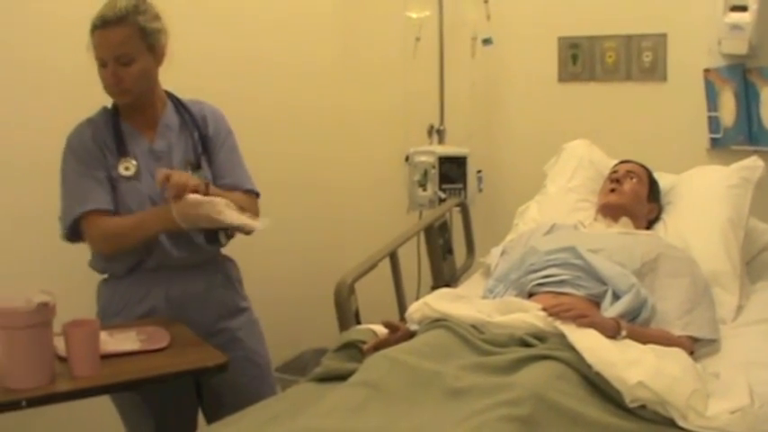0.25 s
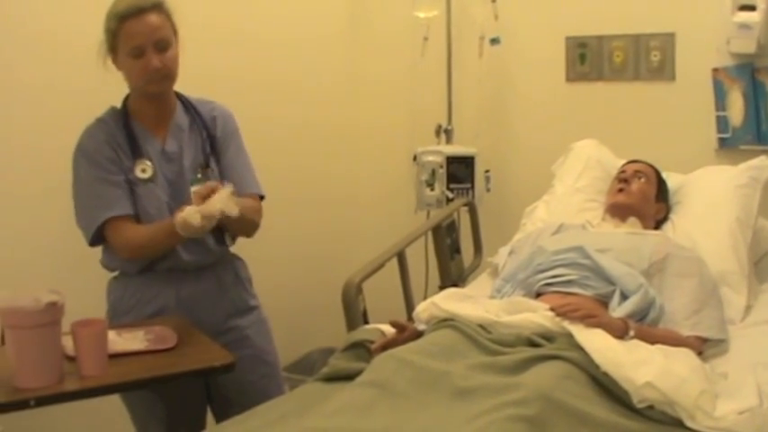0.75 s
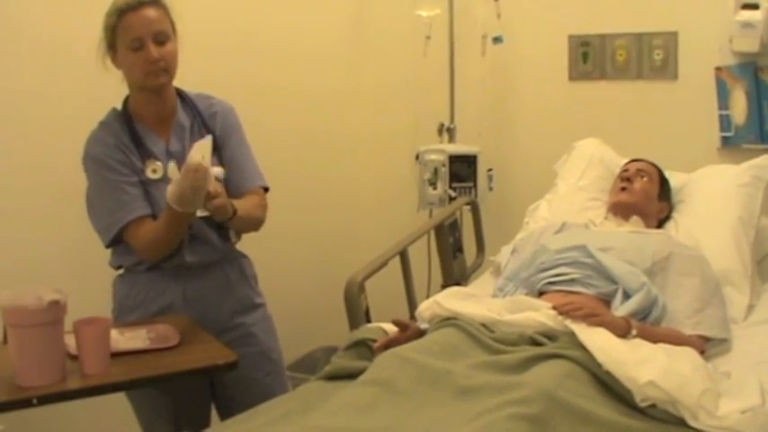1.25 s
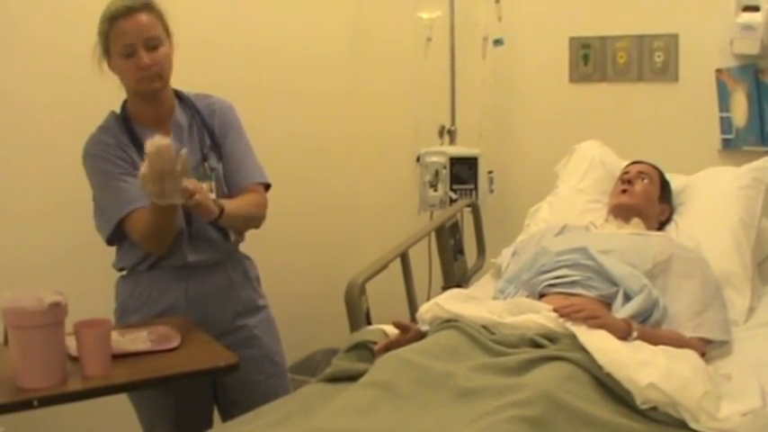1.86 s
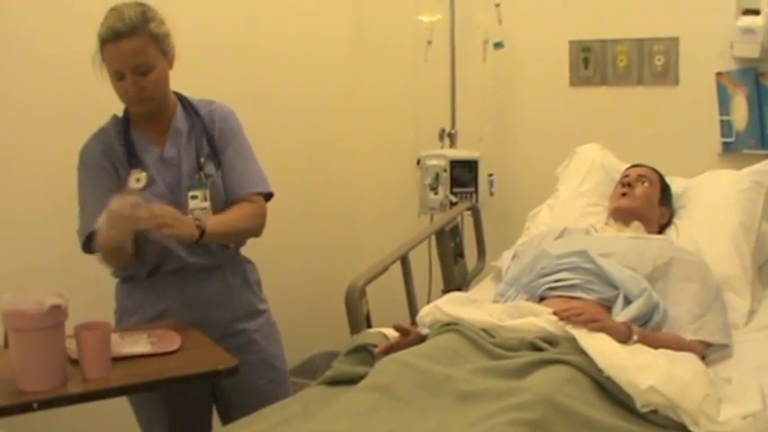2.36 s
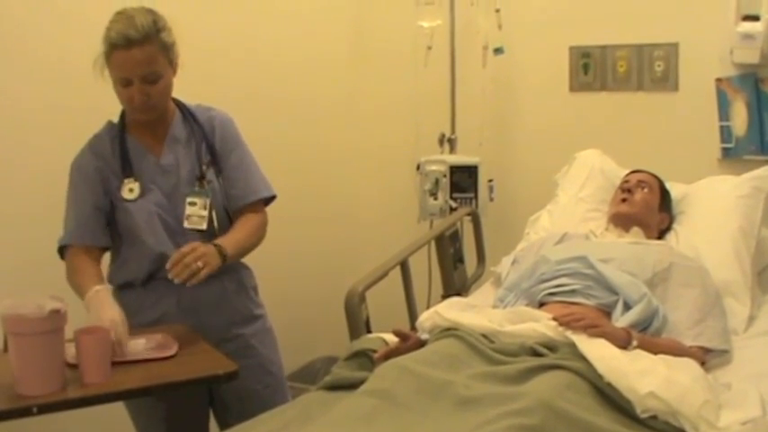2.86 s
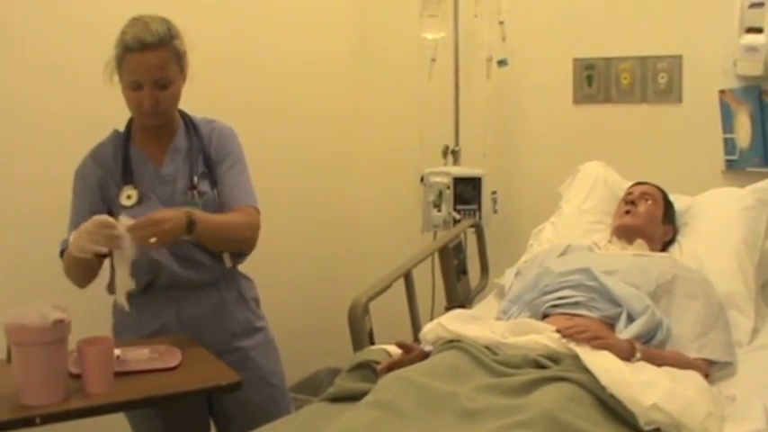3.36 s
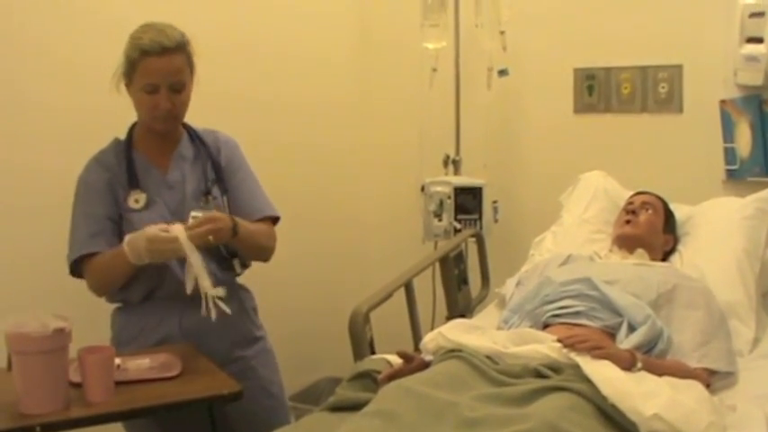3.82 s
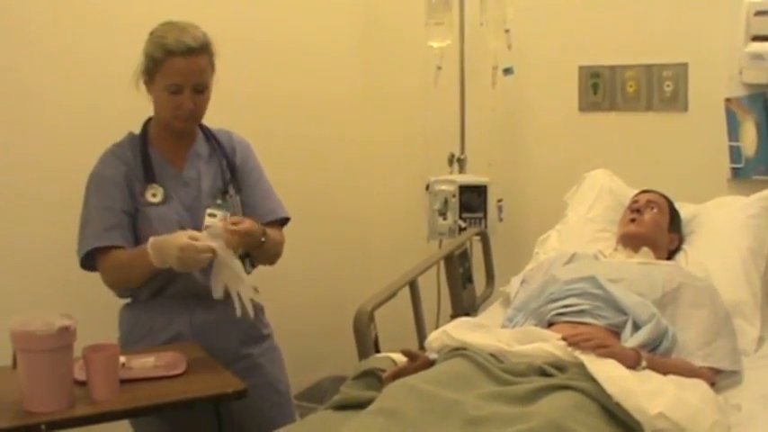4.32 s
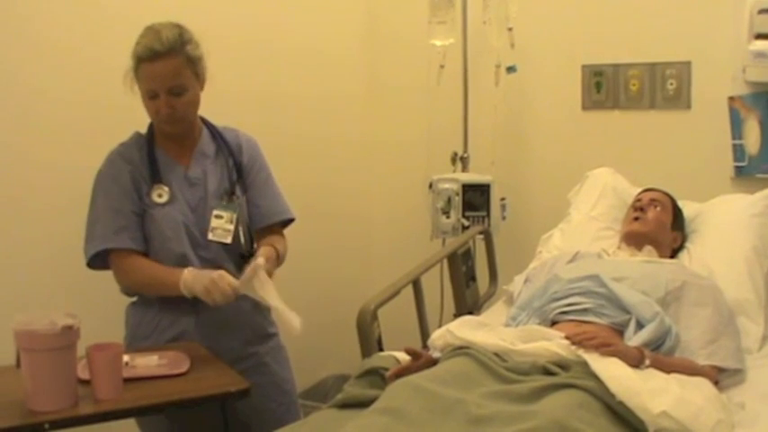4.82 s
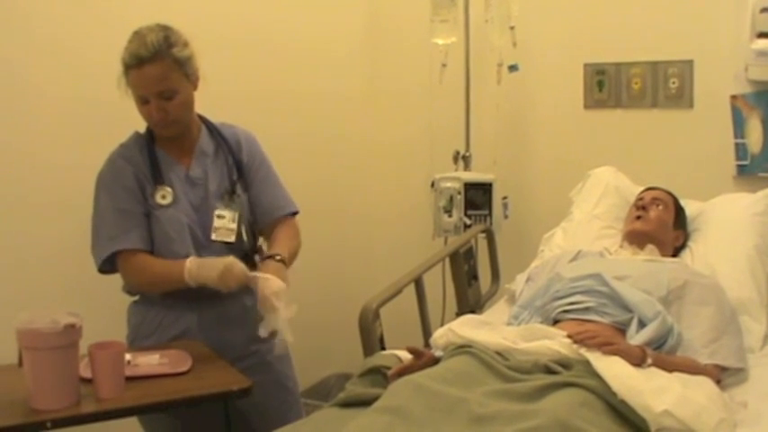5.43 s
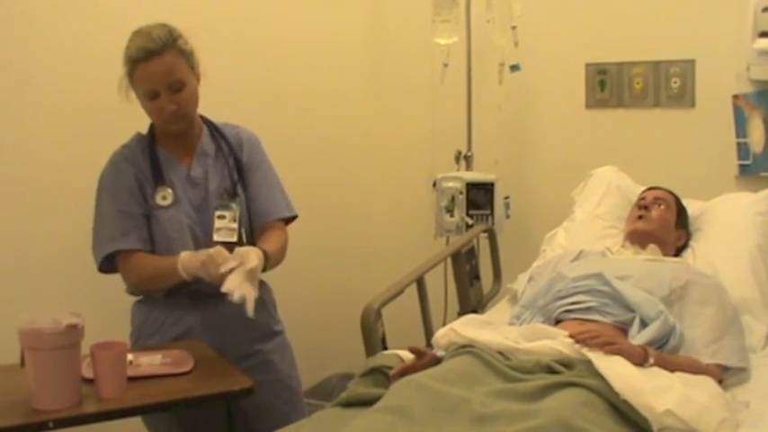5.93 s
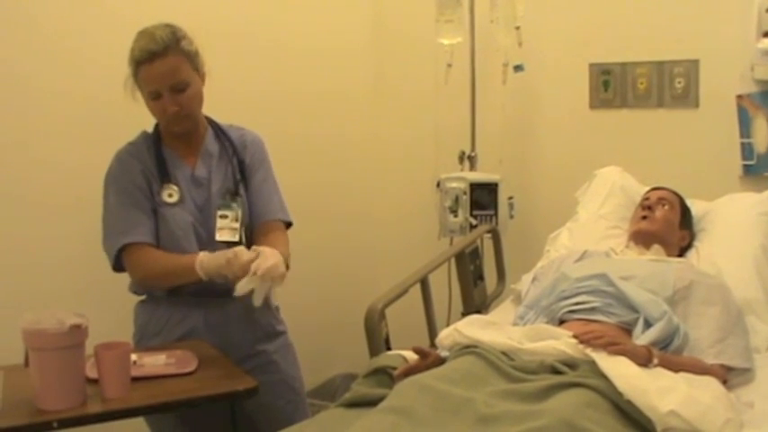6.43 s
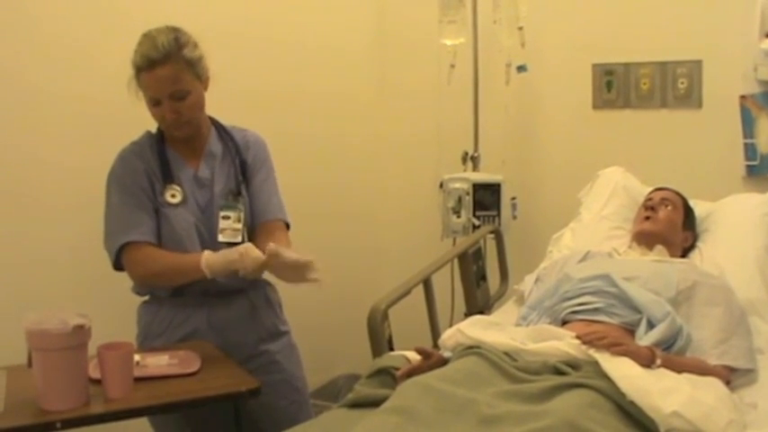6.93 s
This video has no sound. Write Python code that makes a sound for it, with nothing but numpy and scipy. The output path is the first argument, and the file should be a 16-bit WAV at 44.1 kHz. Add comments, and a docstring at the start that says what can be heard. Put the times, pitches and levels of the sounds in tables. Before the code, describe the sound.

Thin rubber gloves are pulled on with rubbing, crinkling and a few sharp cuff snaps, over a soft ventilation hum in a small room.

```python
"""Rubbing, crinkling and sharp snaps: thin rubber gloves are pulled on in a small, hard-walled room.
The rubber sticks and slips as it drags over the skin, its folds flip over, and the cuff snaps back
against the wrist. Behind this, ventilation hums. A camera a few steps from the hands adds a thin
whine and, near the start, a faint pulsing chirr."""
import sys
import numpy as np
from scipy import signal
from scipy.fft import rfft, irfft
from scipy.io import wavfile
from scipy.ndimage import uniform_filter1d

SR = 44100
rng = np.random.default_rng(int(sys.argv[2]) if len(sys.argv) > 2 else 0)


def master(y):
    """Save y as 16-bit WAV."""
    cut = np.clip(np.atleast_2d(y).T, -1, 1)
    pcm = np.round(cut * 32767)  # scale
    wavfile.write(sys.argv[1], SR, pcm.astype(np.int16))


N = 316638
TIME = np.arange(N) / SR
HZ = np.fft.rfftfreq(N, 1 / SR)
CLICK_SAMPLES = 4096  # space for one crinkle or slap
CLICK_TIME = np.arange(CLICK_SAMPLES) / SR
CLICK_HZ = np.fft.rfftfreq(CLICK_SAMPLES, 1 / SR)


def amp(db):
    """Turns decibels into a number to multiply a sound by."""
    return 10 ** (np.asarray(db) / 20)


def evened(x):
    """Scales a signal so that its average size (rms) is 1."""
    return x / np.sqrt(np.mean(x ** 2) + 1e-20)


def read(points, hz):
    """Reads between (frequency, value) points, spaced the way we hear pitch."""
    f, value = np.transpose(points)
    return np.interp(np.log(hz + 1), np.log(f + 1), value)


def add(mix, start_s, sound):
    """Mixes a sound in at the given time."""
    part = mix[round(start_s * SR):][:len(sound)]
    part += sound[:len(part)]


def coloured(x, gain):
    """Turns each frequency up or down, then scales the result to an average size of 1."""
    return evened(irfft(rfft(x) * gain, N))


def noise_pair():
    """White noise for left and right, nearly the same in the bass and at the very top."""
    # how alike the two sides are: (frequency [Hz], likeness [0-1])
    likeness = [(30, 1.0), (150, 0.99), (300, 0.91), (600, 0.58), (1500, 0.05), (5000, 0.073), (12000, 1)]
    mid, side = rfft(rng.standard_normal((2, N)))
    same = np.clip(read(likeness, HZ), -1, 1)
    mid, side = mid * np.sqrt(1 + same), side * np.sqrt(1 - same)
    return irfft(np.array([mid + side, mid - side]), N)


def ventilation(rush_db=-49.5, hiss_db=-60.5):
    """Moving air makes a low rush and sets the ducts and room humming, over a steady hiss."""
    # tone of the rushing air: (frequency [Hz], relative level [dB])
    rush_colour = [(12, -26), (20, -7), (27, -11), (64, -6), (129, -3), (162, -3.5), (192, -6), (228, -5),
                   (381, -13.5), (468, -13.5), (555, -16), (594, -15.5), (730, -20), (1100, -25.5),
                   (1200, -27), (1560, -72), (2640, -120)]
    # notes at which the ducts and room hum: (frequency [Hz], width [Hz], level [dB])
    hum_notes = [(57.7, 7.5, -62), (79.2, 34, -59.5), (166.6, 13, -56), (443, 38, -71.5), (635, 105, -70.5)]
    # tone of the microphone hiss: (frequency [Hz], relative level [dB])
    hiss_colour = [(600, -42), (1200, 3.5), (2000, 5), (4000, 2), (5600, 1.5), (7000, -0.5), (9000, -1),
                   (12000, -4), (16000, -3.5)]
    rush = amp(rush_db) * coloured(noise_pair(), amp(read(rush_colour, HZ)))
    hum = sum(amp(db) * coloured(noise_pair(), 1 / (1 + (2 * (HZ - f) / width) ** 2))
              for f, width, db in hum_notes)
    hiss = amp(hiss_db) * coloured(noise_pair(), amp(read(hiss_colour, HZ)))
    return rush + hum + hiss


def camera(chirr_hz=2362, chirr_db=-64, pulses_per_s=29.97, whine_hz=15734, whine_db=-82):
    """A brief, uneven, pulsing chirr, likely a lens motor, and a steady electronic whine."""
    pulses = np.cos(np.pi * pulses_per_s * (TIME - .379)) ** 4
    running = np.interp(TIME, [.2, .35, 1.15, 1.7], [0, 1, 1, 0])
    waver = coloured(rng.standard_normal(N), 1 / (1 + ((HZ - chirr_hz) / 25) ** 4))
    rough_tone = np.sin(2 * np.pi * chirr_hz * TIME) + 0.49 * waver
    chirr = amp(chirr_db) * running * pulses * rough_tone
    whine = amp(whine_db) * np.sin(2 * np.pi * whine_hz * TIME)
    return chirr + whine


def scatter(x, t60, delay_s, size=6000):
    """Quick echoes off the arms, table and bed; t60 is the seconds they take to fade by 60 dB."""
    t = np.arange(size) / SR
    signs = rng.choice([-1., 1.], (2, size))
    arrives = (rng.random((2, size)) < .2) * (t > delay_s)
    echoes = signs * arrives * amp(-60 * t / t60)
    return signal.fftconvolve(x[None], echoes / np.linalg.norm(echoes[0]), axes=1)[:, :N]


def room_tail(x, delay_s):
    """The room stores sound at each frequency and lets it out as dying noise."""
    # how long the room rings: (frequency [Hz], time to fade by 60 dB [s])
    fade_times = [(200, 1), (800, 0.46), (3000, 0.8), (7000, 0.32), (15000, 0.53)]
    frames = dict(nperseg=256, noverlap=192)
    delayed = np.pad(x, (round(delay_s * SR), 0))[:N]
    hz, t, bands = signal.stft(delayed, SR, **frames)
    kept = amp(-60 * t[1] / read(fade_times, hz)) ** 2  # share of energy left after each time step
    stored = np.array([signal.lfilter([1 - k], [1, -k], abs(band) ** 2) for k, band in zip(kept, bands)])
    noise = signal.stft(rng.standard_normal((2, N)), SR, **frames)[2]
    return signal.istft(noise / noise.std() * np.sqrt(stored), **frames)[1][:, :N]


def in_room(x, near_db, far_db, near_t60, wall_s, patterns=3):
    """Sound arrives straight from the hands, then off nearby surfaces, then from the whole room."""
    # how much louder the hands are on the left: (frequency [Hz], left minus right [dB])
    left_louder = [(60, -2), (110, 3), (200, 8), (380, 2.5), (700, -1), (1290, 5), (2380, 3.5), (4400, 0.5),
                   (8120, 6.5), (15000, -1.5)]
    # how far the wave on the left is ahead: (frequency [Hz], lead [radians])
    left_lead = [(60, -0.29), (600, 0.82), (900, 1.3), (1380, 1.3), (1980, 0.88), (2500, 1.4), (3100, 0.75),
                 (4500, 0.72), (7150, 0.29), (9200, 1.6), (13000, 0.16)]
    # how wide the echoes sound: (frequency [Hz], side minus centre [dB])
    echo_width = [(200, -5), (600, -11), (1200, 3.5), (2500, -4.5), (4500, -4.5), (8000, 1.5), (13000, -22)]
    left_gain = amp(read(left_louder, HZ) / 2) * np.exp(1j * read(left_lead, HZ) / 2)
    direct = irfft(rfft(x) * np.array([left_gain, 1 / left_gain]), N)
    # the hands move, so one pattern of echoes gives way to the next
    parts = [x * np.cos(np.pi * (2 * TIME + k / patterns)) * np.sqrt(2 / patterns)
             for k in range(patterns)]
    near = sum(scatter(part, near_t60, delay_s=0.0037) for part in parts)
    centre, side = amp(near_db) * near + amp(far_db) * room_tail(x, wall_s)
    side = irfft(rfft(side) * amp(read(echo_width, HZ)), N)
    return direct + np.array([centre + side, centre - side])


def stroke_gain(slow_db, fast_db, attack_s=0.027, release_t60=0.22, rest_db=-78.5):
    """Loudness of one kind of rubbing: each stroke takes hold, swells or eases, and dies away."""
    # pulls of rubber over skin, and loose handling of the second glove:
    # (start [s], length [s], relative level [dB], swell from start to end [dB], sliding speed [0-1])
    strokes = [(-.04, .25, -56.5, -2.5, 0.53), (0.312, 0.16, -60.5, -8, 0.7),
               (0.415, 0.46, -68.5, -4, 0.05), (.74, 0.18, -61.5, -3, 0.54), (0.91, 0.16, -61, 8, 0),
               (1.054, 0.21, -54, -1, 0.2), (1.298, .11, -61, 3, 0.13), (1.452, 0.23, -57, 0.5, 0.22),
               (1.673, 0.085, -55, 14, 0.3), (1.767, 0.14, -52, 3.5, 0.84),
               (1.963, 0.21, -52.5, -6.5, 0.53), (2.22, 0.1, -66, 4, 0.4), (2.327, 0.093, -59.5, 0, 0.8),
               (2.44, 0.092, -65, -3, 0.1), (2.77, 0.16, -64.5, -10, 0), (3.387, 0.088, -62, -2, 0.7),
               (3.491, 0.13, -59.5, -3, 0.76), (3.80, 0.12, -68.5, 4, 0.6), (4.02, .07, -71, -2, 0.9),
               (4.20, .08, -66.5, 3, 0.85), (4.366, .16, -63.5, 4, 0.82), (4.56, 0.19, -68.5, -1, 1),
               (4.863, 0.21, -68.5, -3, 1), (5.037, 0.21, -56, 5, 0.23), (5.273, 0.17, -58.5, 6, 0.67),
               (5.47, 0.14, -60, 1, 0.66), (5.656, 0.22, -63.5, -14, 0.4), (5.865, 0.19, -63, -4, 0.17),
               (6.123, 0.13, -59.5, -7, 0.22), (6.279, 0.27, -56.5, -0.5, 0.19), (6.543, 0.25, -55, 0, .35),
               (6.778, 0.25, -53, 4, 0.69), (7.047, .13, -58.5, -1, 0.6)]
    power = np.full(N, amp(rest_db + slow_db) ** 2)  # the gloves stir faintly between strokes
    for start, length, level_db, swell_db, speed in strokes:
        t = np.arange(0, length + release_t60, 1 / SR)
        speed_db = slow_db + speed * (fast_db - slow_db)
        hold_db = level_db + swell_db * (np.minimum(t / length, 1) - .5) + speed_db
        fade_db = 60 * np.maximum(t - length, 0) / release_t60
        shape = np.minimum(t / attack_s, 1) * amp(hold_db - fade_db)
        add(power, max(start, 0), shape[start + t >= 0] ** 2)
    return np.sqrt(power)


def slips(per_s, spread_db, smooth):
    """Rubber sticks and lets go in tiny clicks of uneven size, over a smooth rubbing noise."""
    size = amp(spread_db * np.minimum(rng.exponential(1, N), 4))
    clicks = size * rng.choice([-1., 1.], N) * (rng.random(N) < per_s / SR)
    return evened(clicks) + smooth * rng.standard_normal(N)


def rubbing(jerk_db=1.33):
    """Rubber moves over skin in jerks: slow dragging is coarse and low, fast sliding is a fine hiss."""
    # tones of coarse dragging, gripping and fine hiss: (frequency [Hz], relative level [dB])
    drag = [(200, -5.5), (600, -4.5), (1200, -5.5), (1900, -1), (2700, -9), (4000, -16), (9000, -34)]
    grip = [(1200, -32), (2300, -4.5), (3200, 0.5), (4300, -1), (5700, 0), (7200, -7), (11000, -18)]
    hiss = [(3500, -18), (6500, -7), (8400, 2), (10500, -1), (13000, -5), (16000, -14.5)]
    jerks = amp(jerk_db * coloured(rng.standard_normal(N), (HZ > 10) & (HZ < 55)))
    layers = [(drag, stroke_gain(slow_db=0.5, fast_db=-9), slips(per_s=500, spread_db=5.5, smooth=0.78)),
              (grip, stroke_gain(slow_db=-1, fast_db=-1), slips(per_s=1400, spread_db=2, smooth=0.76)),
              (hiss, stroke_gain(slow_db=-9, fast_db=0.5), slips(per_s=5100, spread_db=5, smooth=1))]
    return jerks * sum(gain * coloured(noise, amp(read(colour, HZ))) for colour, gain, noise in layers)


def click_filter(gain):
    """A filter with this gain at each frequency that rings only after a click, never before it."""
    log_gain = np.log(np.maximum(gain, 1e-5))
    mirrored = np.r_[log_gain, log_gain[-2:0:-1]]
    return np.exp(np.conj(signal.hilbert(mirrored)))[:len(gain)]


def flutter(fade_s, click):
    """The frequencies in one touch: a first click, then a quickly dying flutter of the thin rubber."""
    fade_s = np.clip(fade_s, 1e-4, .03)
    burst = rng.standard_normal(CLICK_SAMPLES) * np.exp(-CLICK_TIME / fade_s)
    burst /= np.linalg.norm(burst)
    burst[0] += click * np.exp(-fade_s / 0.0023)  # slow touches start softly
    spectrum = rfft(burst)
    band_power = uniform_filter1d(abs(spectrum) ** 2, size=70)
    return spectrum * click_filter(band_power ** -.5)  # equally strong from low to high


def crinkles(skirt=0.025):
    """Each fold flips over and sounds around one rough pitch, set by its size."""
    # flipping folds, short rubs and light taps:
    # (time [s], level [dB], centre pitch [Hz], width [octaves], flutter time [s])
    folds = [(.3440, -17.5, 3640, 0.94, 0.0025), (.3615, -17, 840, 0.57, 0.003),
             (1.054, -21.5, 1550, 0.38, .02), (1.0798, -13, 3150, .77, 0.0056),
             (1.165, -18, 1900, 0.79, .025), (1.223, -20.5, 3200, .75, .0017),
             (1.2536, -22.5, 2980, 0.67, .003), (1.6462, -23.5, 3180, 0.44, 0.0014),
             (1.940, -23.5, 2000, 1.3, 0.002), (2.742, -14.5, 540, 0.51, .033),
             (2.9256, -31.5, 4350, 0.62, 0.0009), (3.0087, -26.5, 1230, .47, 0.0013),
             (3.8207, -34.5, 4100, 0.62, .003), (5.0673, -20.5, 2360, .36, 0.00081),
             (5.087, -20, 2700, .26, .006), (5.098, -20, 2280, .38, .0018), (5.134, -20, 3000, 0.38, .003),
             (5.1470, -18, 2200, 0.6, .0023), (5.179, -19, 2410, 1.2, 0.016),
             (5.4148, -25, 1880, 0.41, 0.013), (5.9054, -31, 4000, 0.96, .004),
             (6.3217, -23, 2500, .35, .01), (6.4314, -22.5, 1640, .22, 0.035),
             (6.640, -25, 3040, 0.19, 0.016), (6.736, -23, 3160, 0.6, 0.0073),
             (6.865, -25, 2850, .25, .017), (7.005, -23.5, 6000, 1.2, 0.0074)]
    out = np.zeros(N)
    for start, db, centre_hz, octaves, flutter_s in folds:
        away = np.log2((CLICK_HZ + 1) / centre_hz) / octaves
        colour = evened(np.exp(-away ** 2 / 2) + skirt / (1 + abs(away)))  # a peak with faint, wide edges
        add(out, start, irfft(flutter(flutter_s, click=0.67) * click_filter(amp(db) * colour)))
    return out


def snaps(slap_db=-2, pop_hz=700, smack_hz=2300, crack_hz=6000, ring_t60=0.018):
    """The cuff slaps the wrist: trapped air pops, the thin rubber cracks and, pulled tight, rings."""
    # rubber hitting skin, often several slaps to a snap; levels are relative:
    # (time [s], air pop [dB], smack [dB], crack [dB], flutter time [s], ring pitch [Hz], ring [dB])
    slaps = [(.2826, -21, -24, -1.5, 0.00045, 3920, -9.5), (0.2855, -9.5, -25, -7.5, 0.0018, 1310, -15),
             (1.9969, -3, -4.5, 0.5, 0.0027, 870, -11.5), (1.9997, -3.5, -0.5, 3.5, 0.00073, 584, -5.5),
             (2.0015, -2.5, 0.5, -5, 0.00098, 1290, -7.5), (2.7262, -14, -19, -14.5, 0.00021, 1100, -15.5),
             (2.7302, -18, -10, -13.5, 0.0013, 3430, -22), (2.7341, -6.5, -8.5, -11.5, 0.012, 442, -21),
             (3.0963, -23, -17, -20, 0.0023, 2580, -25), (3.11, -5, -11, -4, 0.0052, 870, -20),
             (3.1142, -18.5, -5, -1.5, 0.0015, 2160, -11.5), (3.117, -2.5, -27, 1, 0.0011, 3880, -11),
             (5.1929, -19, -1, -15.5, 0.00057, 1784, -13), (5.7236, -16.5, -20, -12.5, 0.006, 2100, -31)]
    # overall tone of a slap: (frequency [Hz], relative level [dB])
    slap_colour = [(60, -55), (250, -12.5), (500, 4.5), (1000, 3), (2200, 6), (4700, -2.5), (8000, -7),
                   (11000, -8.5), (16000, -16)]
    # notes of the stretched cuff and the air under it: (frequency [Hz], width [Hz], boost [dB])
    cuff_notes = [(419, 21, 10.5), (610.5, 58, 11.5), (927, 58, 7.5), (1280, 180, 3), (2510, 160, 5),
                  (3200, 280, 4), (3880, 140, 6.5), (6700, 4700, 9), (9000, 570, 8), (10500, 670, 6)]
    cuff_db = sum(db / (1 + (2 * (CLICK_HZ - f) / width) ** 2) for f, width, db in cuff_notes)
    body_db = slap_db + read(slap_colour, CLICK_HZ) + cuff_db
    out = np.zeros(N)
    for start, pop_db, smack_db, crack_db, flutter_s, ring_hz, ring_db in slaps:
        blow_db = read([(pop_hz, pop_db), (smack_hz, smack_db), (crack_hz, crack_db)], CLICK_HZ)
        slap = irfft(flutter(flutter_s, click=0.3) * click_filter(amp(body_db + blow_db)))
        ring = np.sin(2 * np.pi * ring_hz * CLICK_TIME) * amp(-60 * CLICK_TIME / ring_t60)
        add(out, start, slap + amp(ring_db) * ring / np.linalg.norm(ring))
    return out


def scene():
    """The gloves and their echoes, over the ventilation and the camera."""
    snapping = in_room(snaps(), near_db=-8.0, far_db=-14.5, near_t60=0.12, wall_s=0.0026)
    handling = in_room(crinkles() + rubbing(), near_db=-5.5, far_db=-7.5, near_t60=0.079, wall_s=0.004)
    return snapping + handling + ventilation() + camera()


def record(dry):
    """Cuts away the very highest treble."""
    low_pass = signal.firwin(511, cutoff=15950, window=("kaiser", 9), fs=SR)
    return signal.oaconvolve(dry, low_pass[None], "same")


dry = scene()
out = record(dry)
master(out)
```